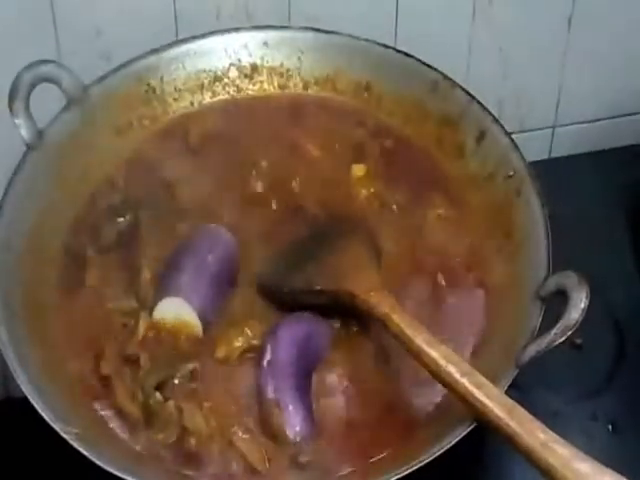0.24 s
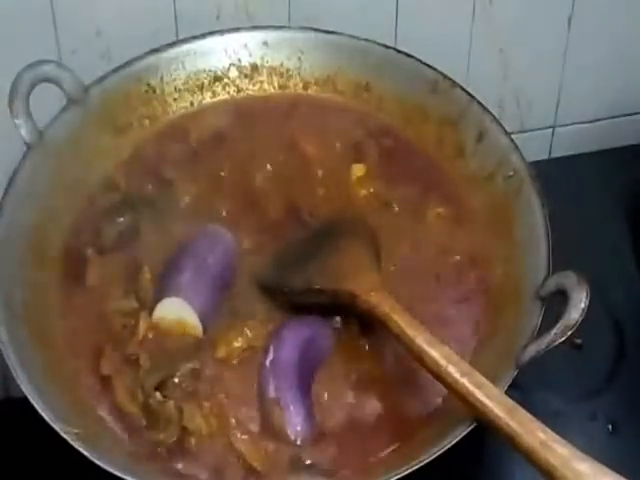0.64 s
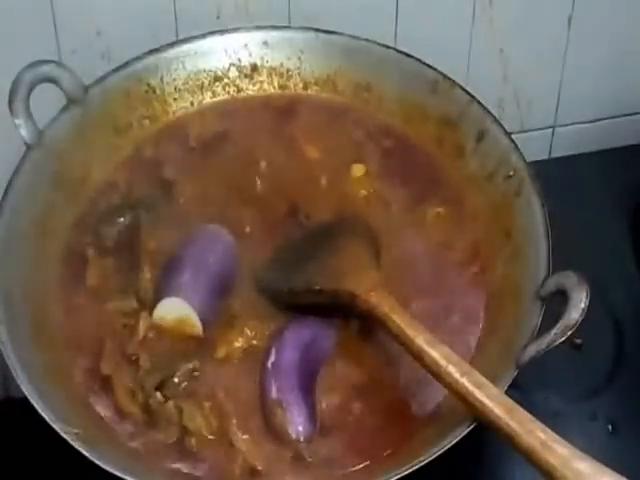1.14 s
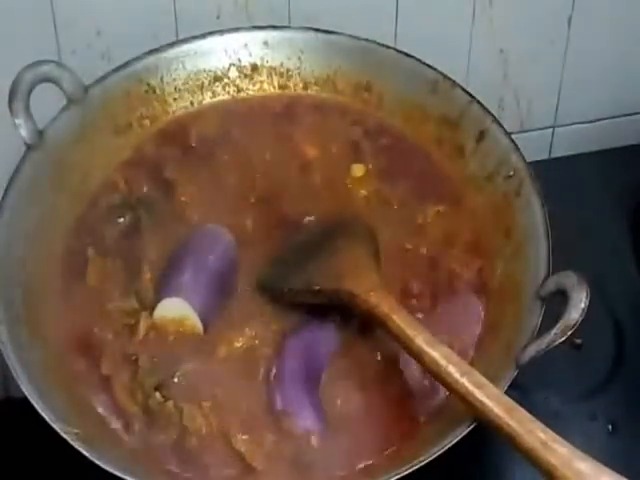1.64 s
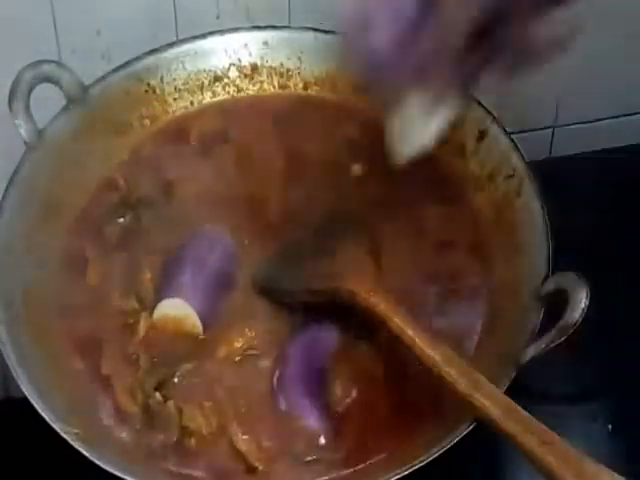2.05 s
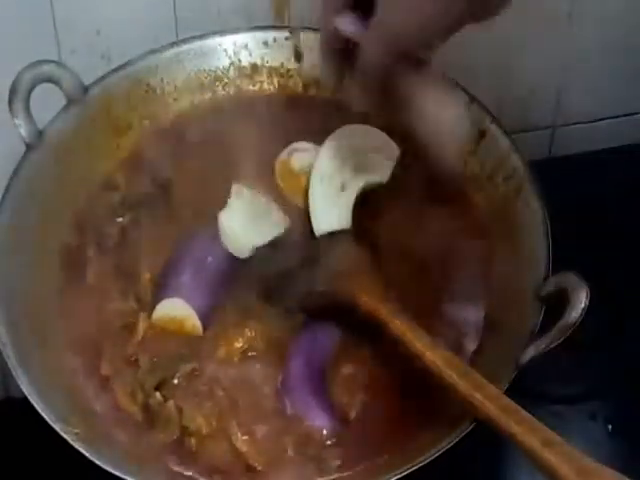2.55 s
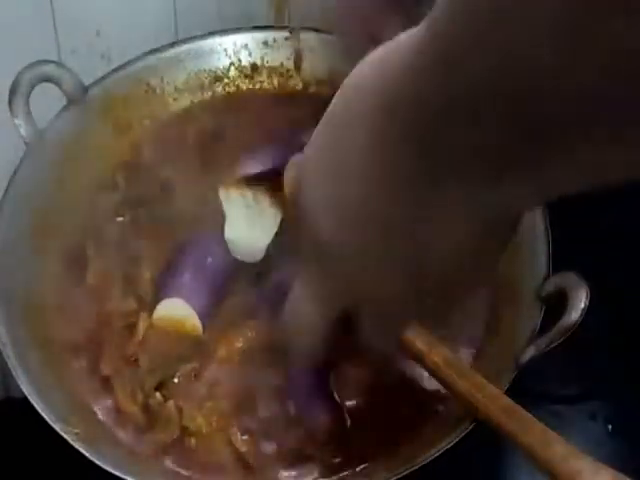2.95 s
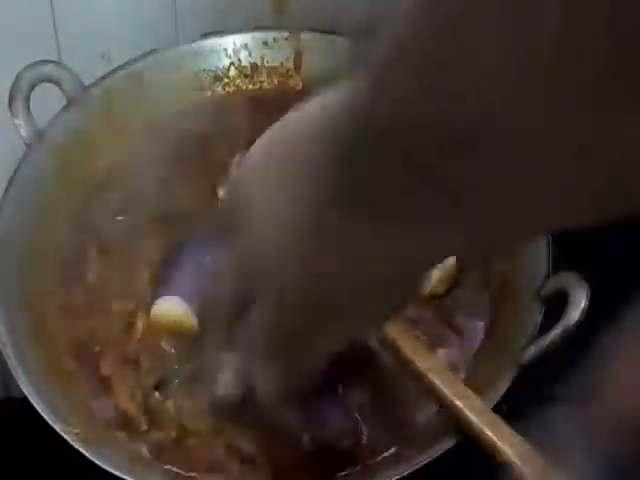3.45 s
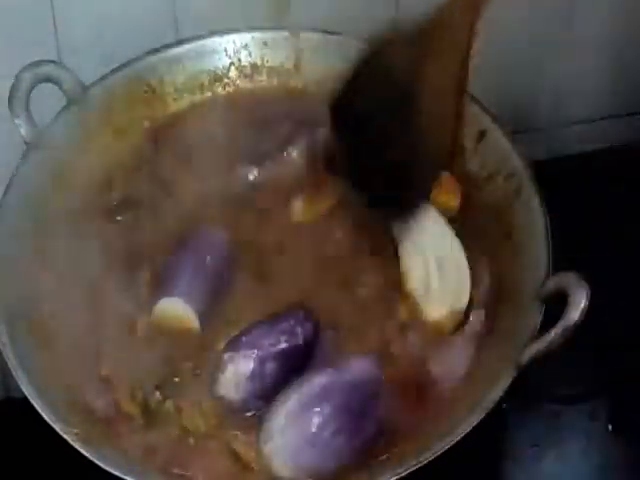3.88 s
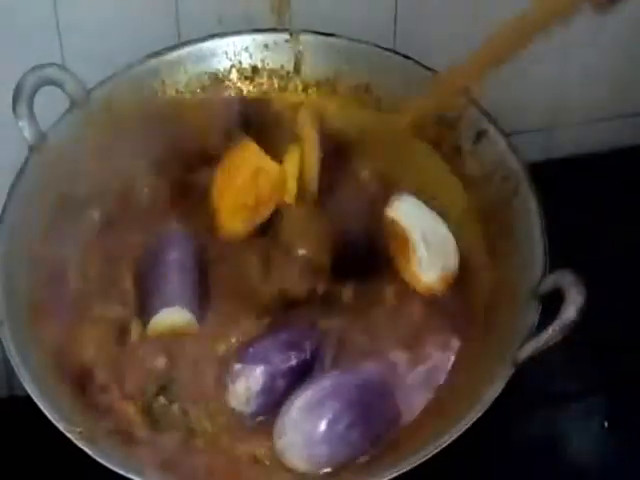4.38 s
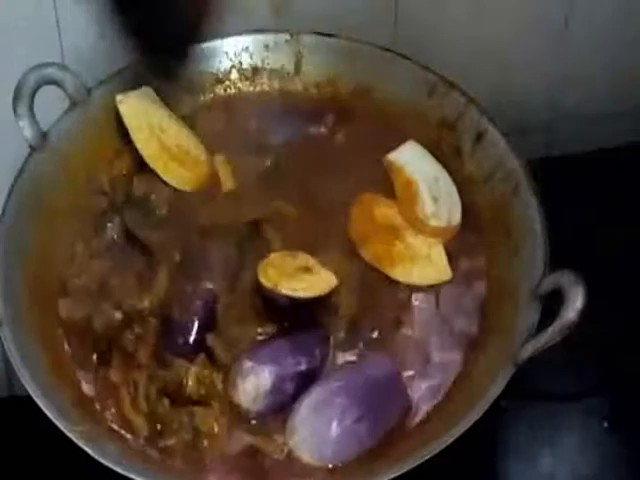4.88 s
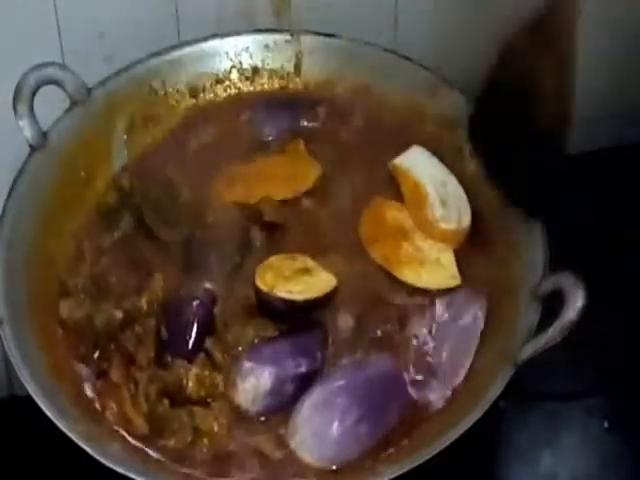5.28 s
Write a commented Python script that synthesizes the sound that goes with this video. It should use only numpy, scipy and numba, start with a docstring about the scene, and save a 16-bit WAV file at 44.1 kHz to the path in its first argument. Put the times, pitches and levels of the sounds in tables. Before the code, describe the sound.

A continuous bubbling simmer with bright oil sizzle and irregular dry crackles, heard very near. Early spits and squeaky steam lead to a soft thud and low wet plops as eggplant drops in. Sharp snaps strike midway, sauce sloshes about a second later, then pops thin out under thin bird chirps before one big burst. Low burner rumble lies beneath; the phone briefly dips after loud pops.

```python
"""Bubbles pop and oil spits in thick sauce boiling in a steel wok, close to a phone in a tiled kitchen.
Each pop is a click and a dying spray of noise ringing a small cavity; thousands of tiny ones make the simmer.
Vegetables plop and thud in, the sauce sloshes as filtered noise, and steam squeaks as gliding notes.
Outside a small bird peeps, over a low rumble and hum. The level dips briefly after loud pops."""
import sys
import numpy as np
from scipy import signal
from scipy.fft import rfft, irfft
from scipy.io import wavfile
from scipy.ndimage import uniform_filter1d
from numba import njit

SR = 44100
rng = np.random.default_rng(int(sys.argv[2]) if len(sys.argv) > 2 else 0)


def generate_wav(signal):
    """Clip the signal to [-1, 1] and save it as 16-bit WAV at the path in sys.argv[1]."""
    frames = np.transpose(np.atleast_2d(signal))
    scaled = np.clip(frames, -1, 1) * 32767
    pcm = np.round(scaled).astype(np.int16)
    wavfile.write(sys.argv[1], SR, pcm)


N = 243476  # length [samples]
# Table levels are set before the steel and the microphone change them.


def undb(db):
    """Turn decibels into a plain multiplier."""
    return 10 ** (np.asarray(db) / 20)


def level(x, db):
    """Scale a sound to an average (RMS) level in dB."""
    return x * undb(db) / np.sqrt(np.mean(x ** 2))


def colour(x, table):
    """Filter whose gain follows (Hz, dB) points and which never answers before its input (folded cepstrum)."""
    hz, db = np.transpose(table)
    size = 2 ** 13
    log_hz = np.log(np.fft.rfftfreq(size, 1 / SR) + 1)  # +1 avoids log of zero
    cepstrum = irfft(np.log(undb(np.interp(log_hz, np.log(hz), db))))
    cepstrum[1:size // 2] *= 2
    cepstrum[size // 2 + 1:] = 0
    response = irfft(np.exp(rfft(cepstrum)))
    return signal.fftconvolve(x, response)[:N]


def band(x, low_hz, high_hz):
    """Keep only the range between two pitches."""
    return signal.sosfilt(signal.butter(2, [low_hz, high_hz], "band", fs=SR, output="sos"), x)


def sputter(clump_s, spread_db):
    """Noise in short uneven clumps: droplets and echoes after a burst."""
    k = int(clump_s * SR)
    steps = np.repeat(undb(spread_db * rng.standard_normal(N // 4)), k)[:N]
    clumps = uniform_filter1d(steps, k)
    return level(clumps * rng.standard_normal(N), 0)


@njit
def bursts(n, rate, s, size, hz, width, t60, tail, rise, noise, push, click):
    """Each burst is a click, a short push and a dying spray, ringing a cavity whose pitch can rise as it opens."""
    out = np.zeros(n)
    for e in range(len(s)):
        start = int(s[e] * rate)
        band_state, low_state, turns = 0., 0., 0.
        spray = tail[e]
        fade = np.exp(-np.log(1000.) / (t60[e] * rate))  # down 60 dB after t60
        damping = width[e] / hz[e]
        kick = rate / (2 * np.pi * width[e])
        for i in range(start, min(n, start + int(t60[e] * rate))):
            now_hz = hz[e] * (1 + rise * (1 - spray / tail[e]))
            g = np.tan(np.pi * now_hz / rate)
            drive = spray * np.sqrt(kick) * noise[(i + 7919 * e) % n]
            if i == start:
                drive += click * kick
            if turns < push:
                drive += np.cos(2 * np.pi * turns) * np.cos(.5 * np.pi * turns / push)
                turns += now_hz / rate
            # one step of a band-pass resonator
            ring = (band_state + g * (drive - low_state)) / (1 + g * (g + damping))
            band_state, low_state = 2 * ring - band_state, low_state + 2 * g * ring
            out[i] += size[e] * damping * ring
            spray *= fade
    return out


def play(s, db, hz, t60, cycles, tail_db, rise, push=(0, 0)):
    """Bursts in a cavity of sharpness (Q) cycles, with a sputtering tail; push is (cycles, first click dB)."""
    ones = np.ones(len(s))
    spray = sputter(clump_s=.0008, spread_db=3.8)
    return bursts(N, 1. * SR, s, undb(db), hz * ones, hz / cycles * ones, np.clip(t60, .004, .4) * ones,
                  undb(tail_db) * ones, rise, spray, 1. * push[0], float(undb(push[1])))


def tail_under(db, tail):
    """The louder the click, the further its tail lies under it."""
    _, tail_db, drop_per_db = tail
    return tail_db - drop_per_db * (db + 10)


CRACK_TAIL_DB = -6  # the crack sputters less than the cavity


def pops(table, tail, push, cycles, crack_db, crack_hz, rise):
    """Loud single bursts: the cavity note and the broad crack of the tearing film."""
    s, db, hz = table
    t60, tail_db = tail[0], tail_under(db, tail)
    cavity = play(s, db, hz, t60, cycles, tail_db, rise, push)
    crack = play(s, db + crack_db, crack_hz, t60, 0.8, tail_db + CRACK_TAIL_DB, 0.)
    return cavity + crack


def notes(table, end_s):
    """Pure notes that glide straight from one pitch to another, with soft ends."""
    out, t = np.zeros(N), np.arange(N) / SR
    for s, length, first_hz, last_hz, db in table:
        ends = np.clip(np.minimum(t - s, s + length - t) / end_s, 0, 1)
        hz = np.interp(t, (s, s + length), (first_hz, last_hz))
        tone = np.sin(2 * np.pi * np.cumsum(hz) / SR)
        out += ends * np.sqrt(2) * undb(db) * tone
    return out


# Tone of the burner and house rumble: (pitch [Hz], relative level per Hz [dB])
RUMBLE_TONE = [(15, -28), (25, -12.5), (130, -10.5), (165, -3), (215, -3), (245, 1), (285, -4), (330, 2.5),
               (380, 1.5), (430, -11), (700, -59)]
RUMBLE_DB = -55


def rumble():
    """Burner and house rumble: noise filtered down to the bass."""
    return level(colour(rng.standard_normal(N), RUMBLE_TONE), RUMBLE_DB)


# A faint low hum that comes and goes:
# (start time [s], length [s], first pitch [Hz], last pitch [Hz], level [dB])
HUM_NOTES = [(0, 0.48, 237, 251.4, -58), (1.95, 0.64, 233.6, 256.5, -61)]


def hum():
    """Low pure notes that swell in and fade out."""
    return notes(HUM_NOTES, end_s=0.072)


# Peeps of a small bird: (start time [s], length [s], first pitch [Hz], last pitch [Hz], level [dB])
BIRD_PEEPS = [(.237, .065, 5930, 5910, -33), (2.24, .07, 7680, 7830, -36), (2.312, .022, 7750, 7600, -35),
              (2.435, .035, 8200, 7300, -39), (2.687, .058, 5760, 5950, -39.5),
              (4.81, .09, 5450, 6150, -37), (4.972, .03, 7500, 7800, -42), (4.998, .06, 7830, 7920, -29),
              (5.057, .03, 7770, 7600, -33), (5.186, .016, 7850, 7580, -31), (5.203, .018, 7250, 7150, -34),
              (5.208, .04, 7880, 7860, -39), (5.228, .02, 6000, 5600, -39), (5.325, .04, 6820, 7020, -33),
              (5.408, .035, 7450, 7000, -35)]


def bird(echo_db, t60, rough):
    """Slightly hoarse peeps from outside, blurred by the walls on their way in."""
    t = np.arange(int(t60 * SR)) / SR
    walls = rng.standard_normal(len(t)) * undb(-60 * t / t60)
    hoarseness = level(uniform_filter1d(rng.standard_normal(N), size=220), 0)
    peeps = notes(BIRD_PEEPS, end_s=0.007) * (1 + rough * hoarseness)
    echo = signal.fftconvolve(peeps, walls / np.linalg.norm(walls))[:N]
    return peeps + undb(echo_db) * echo


# Ringing modes of the steel: (pitch [Hz], width [Hz], lift ringing freely [dB], lift when loaded [dB])
STEEL_MODES = [(459, 38, 0.22, 0.75), (605, 15.4, 4.6, 6.7), (1080, 43, 11.3, 3.6), (1336, 11, 0.33, 6.7),
               (1830, 10, 9.5, 0.74), (2060, 9.6, 6.7, 0.33), (2370, 23, 7.8, 4.8), (3070, 59, 1.3, 2.7),
               (4670, 14, 2.8, 4.5)]
# How far sauce and vegetables load the steel: (time [s], load [0 free to 1 loaded])
STEEL_LOAD = [(0, 0.56), (.8, 0.27), (.92, 0.046), (1.6, 0.08), (1.72, 0.42), (1.92, .2), (2.3, 0.29),
              (2.42, 0.55), (2.9, 0.95), (5.52, 1)]
SWAY_S, SWAY_DB = .12, 1.5  # moving sauce frees and damps each mode: step time, typical depth


def wok(x):
    """The steel bowl lifts its own modes; what lies in it damps some and frees others."""
    t = np.arange(N) / SR
    load = np.interp(t, *np.transpose(STEEL_LOAD))
    knots = np.arange(0, t[-1] + SWAY_S, SWAY_S)
    out = x
    for hz, width, free_db, loaded_db in STEEL_MODES:
        sway_db = SWAY_DB * np.interp(t, knots, rng.standard_normal(len(knots)))
        lift = undb(free_db + load * (loaded_db - free_db) + sway_db) - 1
        out = out + lift * signal.lfilter(*signal.iirpeak(hz, hz / width, SR), x)
    return out


PAN_LOW_HZ = 398  # the pan is too small to radiate below this


def rim(x):
    """The open bowl sends out no deep bass."""
    return signal.sosfilt(signal.ellip(5, .5, 30, PAN_LOW_HZ, "high", fs=SR, output="sos"), x)


def swarm(count, low_hz, high_hz, spread_db, cycles, t60, hiss_db):
    """Tiny random bursts of uneven strength, over the hiss of the ones too many to tell apart."""
    when, pitch, strength, ring = rng.random((count, 4)).T
    hz = low_hz * (high_hz / low_hz) ** pitch
    db = -spread_db * np.log(strength * 1.3 + 0.1)
    grains = play(when * N / SR, db, hz, t60, cycles * 1.2 ** (ring - .4), -5, 0.017, (3.0, -1))
    hiss = band(rng.standard_normal(N), low_hz, high_hz)
    return level(level(grains, 0) + level(hiss, hiss_db), 0)


# Strength of the simmer: (time [s], gurgle level [dB], fizz level [dB], sizzle level [dB])
SIMMER_LEVELS = [(0.0, -34, -29, -29.5), (0.42, -33.5, -29, -30), (1.0, -33, -29.5, -28),
                 (1.18, -35, -34.5, -30), (1.41, -34, -29.5, -28), (1.83, -35, -30.5, -30.5),
                 (2.38, -30.5, -28, -27.5), (2.72, -36, -30.5, -29.5), (2.93, -30.5, -31.5, -29.5),
                 (3.2, -34, -31, -30), (3.5, -33.5, -31, -32), (3.75, -32.5, -30.5, -31.5),
                 (3.93, -33, -30, -30), (4.26, -32, -31.5, -31.5), (4.43, -33.5, -29.5, -28.5),
                 (4.7, -35.5, -30, -32), (5.12, -34, -34, -31.5), (5.52, -35, -31.5, -29)]
HEAVE_S, HEAVE_DB = 0.026, 1  # the whole boil heaves and settles: smoothing time, typical depth


def simmer():
    """Large bubbles gurgle, small ones fizz, oil sizzles; all heave together and ring the steel."""
    s, *columns = np.transpose(SIMMER_LEVELS)
    gurgle, fizz, sizzle = (undb(np.interp(np.arange(N) / SR, s, c)) for c in columns)
    k = int(HEAVE_S * SR)
    drift = uniform_filter1d(uniform_filter1d(rng.standard_normal(N), k), k)
    heave = level(undb(level(drift, 0) * HEAVE_DB), 0)
    boil = gurgle * swarm(count=1400, low_hz=285, high_hz=1500, spread_db=-3.5, cycles=3.74, t60=0.15, hiss_db=1.0)
    boil += fizz * swarm(count=1600, low_hz=1396, high_hz=5040, spread_db=2.2, cycles=9.9, t60=0.12, hiss_db=-8)
    boil += sizzle * swarm(count=1800, low_hz=5030, high_hz=12630, spread_db=3.5, cycles=5.7, t60=0.047,
                           hiss_db=-2.5)
    return wok(heave * boil)


def crackle(count, hz, db, spread_db):
    """Dry broad ticks of droplets flashing on hot steel, up to an octave either side of hz."""
    when, strength, pitch = rng.random((count, 3)).T
    tick_db = db - spread_db * np.log(strength + .05)
    return play(when * N / SR, tick_db, hz * 2 ** (2 * pitch - 1), 0.039, 1.3, -11, 0.)


# Steam squeaking out through the sauce:
# (start time [s], length [s], first pitch [Hz], last pitch [Hz], level [dB])
STEAM_SQUEAKS = [(.8, .022, 4320, 4280, -40), (.96, .035, 2900, 3050, -42), (1.035, 0.025, 3050, 3000, -33),
                 (1.075, .05, 1750, 1750, -37), (1.11, 0.035, 3350, 3500, -39),
                 (1.145, .03, 3600, 3750, -41), (1.165, .05, 3250, 3120, -36),
                 (1.24, 0.06, 3250, 3080, -40)]


def squeaks():
    """Escaping steam sings short gliding notes."""
    return notes(STEAM_SQUEAKS, end_s=0.0042)


# Wet surges as pieces drop in, foam collapses and the spatula pushes the sauce:
# (middle time [s], half length [s], low edge [Hz], high edge [Hz], level [dB])
SURGES = [(0.956, 0.026, 2000, 5300, -28), (1.04, 0.042, 1000, 3300, -31.5),
          (1.18, 0.068, 1500, 3600, -29.5), (1.472, 0.0099, 2800, 7200, -21),
          (2.284, 0.011, 400, 2020, -29), (2.37, 0.012, 380, 2500, -37), (2.425, 0.019, 380, 1840, -30),
          (2.95, 0.13, 377, 1120, -40.5), (3.462, 0.028, 397, 2520, -29.5), (3.924, 0.016, 503, 2550, -37),
          (4.445, 0.046, 450, 3030, -26.5), (4.535, 0.03, 450, 1500, -36), (4.63, 0.012, 450, 2500, -27)]


def sloshes():
    """Each surge is a swell of sputtering spray in its own range, ringing the steel."""
    t, spray, out = np.arange(N) / SR, sputter(clump_s=0.0024, spread_db=4), 0
    for s, half, low_hz, high_hz, db in SURGES:
        swell = np.exp(-((t - s) / half) ** 2)
        out = out + level(band(spray, low_hz, high_hz), db) * swell
    return wok(out)


# The first piece hits the pan: (time [s], pitch [Hz], time to fade 60 dB [s])
PAN_THUD = [(2.24, 150, .1)]
THUD_DB = -49


def thud():
    """A low, quickly damped knock."""
    s, hz, t60 = np.transpose(PAN_THUD)
    return play(s, np.full(len(s), THUD_DB), hz, t60, 1.4, 0, 0.)


# Each TAIL below: (time to fade 60 dB [s], tail level for a -10 dB burst [dB], extra drop per dB louder [dB])
# Each PUSH below, the drive as the cavity opens: (length [cycles], first click [dB])

# Big slow bubbles and pieces plopping: (time [s], level [dB], pitch [Hz])
PLOP_EVENTS = [(.464, -23, 533), (.49, -17, 1180), (.738, -20, 1100), (.8, -24, 543), (.92, -20, 566),
               (1.031, -25, 1080), (1.033, -21, 1200), (1.053, -24, 1150), (1.099, -29, 564),
               (1.09, -23.5, 1080), (1.564, -22, 1070), (1.817, -28, 1180), (1.937, -20, 1180),
               (2.167, -28, 565), (2.211, -22, 880), (2.266, -21, 600), (2.274, -17, 1310),
               (2.311, -28, 560), (2.357, -17, 494), (2.36, -14, 700), (2.419, -23, 1080),
               (2.423, -34, 1290), (2.44, -22, 444), (2.459, -17, 587), (2.513, -17, 1140),
               (2.548, -24, 573), (2.623, -22, 855), (2.64, -22, 690), (2.66, -19, 1020), (2.834, -20, 496),
               (2.89, -27, 510), (2.931, -18.5, 410), (2.945, -22, 465), (2.948, -22, 955),
               (2.981, -35, 590), (3.045, -21, 746), (3.116, -21, 585), (3.028, -27, 477),
               (3.18, -21.5, 597), (3.454, -24, 550), (3.923, -19, 1000), (3.944, -20, 1050),
               (4.195, -21, 751), (4.405, -23, 1080), (4.511, -19, 675), (5.473, -22, 560),
               (5.501, -10, 600)]
PLOP_TAIL, PLOP_PUSH = (0.15, -16, 0.19), (1.6, -8)


def plops():
    """Large cavities give low notes that rise strongly as they open."""
    return pops(np.transpose(PLOP_EVENTS), PLOP_TAIL, PLOP_PUSH, cycles=2.5, crack_db=-3.0, crack_hz=1500, rise=0.72)


# Bare snaps of a water drop flashing in oil: (time [s], level [dB])
SNAP_EVENTS = [(.4805, -8), (3.118, -1), (3.4867, 10), (3.5492, 4), (4.416, -10), (4.4275, -10),
               (4.495, -12), (4.6858, -10), (4.76, -12)]
SNAP_HZ = 8500


def snaps():
    """A flashing drop gives a very short, broad click."""
    s, db = np.transpose(SNAP_EVENTS)
    return play(s, db, SNAP_HZ, .01, 1.4, -14, 0.)


# Oil and water spitting: (time [s], level [dB], pitch [Hz], top edge against that level as heard [dB])
SPIT_EVENTS = [(.04, -10.5, 9900, -15), (0.042, -14, 6440, -25), (.1073, -12, 10280, -20),
               (0.2262, -10.5, 8440, -25), (.357, -11, 10200, -16), (.363, -9, 6700, -28),
               (.4395, -6, 6700, -28), (0.481, -10, 6700, -4), (.4909, -11, 10240, -20),
               (0.5418, -11, 10100, -18), (.555, -18, 6500, -25), (0.5696, -9, 6240, -22),
               (0.5928, -4.5, 9100, -21), (.598, -14, 9690, -22), (0.8272, -13, 9650, -23),
               (.879, -12, 9250, -2), (.886, -15, 9500, -20), (0.93, -13, 9700, -19), (.94, -10, 6500, -25),
               (0.943, -12, 9800, -2), (.96, -11, 7800, -13), (1.0125, -13.5, 9700, -20),
               (1.085, -5.5, 7900, -22), (1.145, -16, 8600, -17), (1.1597, -10, 9700, -17),
               (1.165, -9, 9600, -18), (1.186, -14, 9050, -22), (1.2203, -13.5, 8500, -21),
               (1.384, -15, 9100, -22), (1.408, -18, 10300, -23), (1.4579, -7, 6660, -34),
               (1.48, -12, 6000, -27), (1.482, -12, 8300, -25), (1.527, -5, 9200, -21),
               (1.575, -21, 9770, -20), (1.601, -16, 9020, -21), (1.768, -4, 9900, -10),
               (1.768, -9, 7850, -28), (1.7887, 3, 7800, -31), (1.879, -16, 7600, -15),
               (1.895, -12, 10500, -20), (1.913, -18, 7500, -28), (1.919, -14, 9170, -28),
               (1.939, -6.5, 10800, -2), (1.94, -16, 7800, -25), (1.974, -16, 8500, -22),
               (2.006, -16, 8800, -22), (2.02, -19, 6200, -25), (2.038, -1, 6100, -30),
               (2.0407, 0.5, 8550, -27), (2.08, -9.5, 10600, -16), (2.1244, -8, 7100, -22),
               (2.14, -20, 9770, -22), (2.223, -13, 5300, -19), (2.268, -8.5, 5100, -21),
               (2.311, -16, 11500, -3), (2.3417, -9, 9450, -15), (2.3624, -13, 6700, -18),
               (2.3985, -14, 9500, 3), (2.414, -13, 10410, -10), (2.426, -10, 6540, -25),
               (2.441, -11, 9700, -15), (2.4687, -13, 9050, -9), (2.487, -13, 5730, -7),
               (2.565, -14, 10100, -22), (2.626, -8.5, 5650, -20), (2.767, -12, 10270, -22),
               (2.807, -11, 11200, -12), (2.8316, -10, 7800, -25), (2.9524, -1, 10800, -24),
               (2.954, -6.5, 7300, -28), (2.979, -4, 8900, -31), (3.118, -10, 10900, 5),
               (3.14, -10, 10200, -3), (3.18, -14, 10500, -31), (3.188, -11, 9600, -7),
               (3.289, -15, 5950, -25), (3.296, -13, 10450, -13), (3.31, -7, 7200, -8),
               (3.318, -11, 6370, -25), (3.3195, -14, 9070, -6), (3.3246, -8.5, 11500, 0),
               (3.3897, -17.5, 9900, -20), (3.405, -12.5, 8900, -21), (3.449, -15, 8750, -19),
               (3.4712, -8, 7200, -21), (3.4723, -12, 9000, -15), (3.4863, -5, 10500, -4),
               (3.549, -13, 9900, -26), (3.5534, -3.5, 5750, -25), (3.758, -15, 10900, -17),
               (3.859, -15, 6800, -25), (3.9324, -8.5, 9000, -21), (3.988, -25, 11200, -15),
               (4.005, -14, 11000, -13), (4.1193, -9.5, 9500, -10), (4.117, -14.5, 6540, -25),
               (4.1409, -9.5, 10200, -16), (4.192, -17, 6800, -25), (4.274, -20, 9450, -24),
               (4.277, -10.5, 6600, -27), (4.5356, -11, 9200, -3), (4.536, -11, 7000, -25),
               (4.553, -16, 9730, -23), (4.632, -17, 10800, -18), (4.686, -16, 10500, 1),
               (4.687, -15, 7660, -22), (4.7142, -7, 5430, -24), (4.722, -15, 11200, -15),
               (4.7322, -13, 7700, -22), (4.736, -13, 5800, -25), (4.76, -15, 7480, -19),
               (4.8065, -11, 6400, -25), (4.83, -13.5, 6800, -25), (4.858, -10, 9400, -26),
               (5.187, -11, 7300, -23), (5.3287, -25, 9400, -10), (5.4112, -14, 7900, -21),
               (5.463, -15, 11000, -18), (5.5, -2, 6240, -30), (5.501, -2, 10300, -25),
               (5.5027, 3, 8300, -25), (5.516, -5, 8000, -22)]
SPIT_TAIL, SPIT_PUSH = (0.059, -12.5, 0.18), (4.2, -6)


def spits(edge_hz):
    """High bursts, each with its own sharp edge at the top of the range."""
    s, db, hz, edge_db = np.transpose(SPIT_EVENTS)
    mic_db = np.interp(edge_hz, *np.transpose(MIC_TONE))  # allow for what the microphone will take away
    edge = play(s, db + edge_db - mic_db, edge_hz, SPIT_TAIL[0], 3.7, tail_under(db, SPIT_TAIL), 0.)
    return edge + pops((s, db, hz), SPIT_TAIL, SPIT_PUSH, cycles=6.1, crack_db=6.5, crack_hz=6600, rise=0.)


# Steam bubbles bursting at the surface: (time [s], level [dB], cavity pitch [Hz])
BUBBLE_EVENTS = [(0.014, -16, 3000), (.034, -23, 4300), (0.035, -20, 1870), (0.061, -28, 1730),
                 (.103, -22, 2140), (.172, -16.5, 3430), (0.178, -16, 2630), (.18, -19, 3500),
                 (0.228, -12, 3070), (.24, -23, 4260), (0.259, -11.5, 4670), (0.261, -20, 3000),
                 (0.271, -23, 1810), (.325, -18, 5500), (0.329, -20, 2630), (0.346, -13, 3080),
                 (.356, -22, 1880), (0.423, -14, 3260), (0.4252, -8, 3830), (.4394, -15, 4540),
                 (0.4816, -13, 4200), (0.4876, -13, 3250), (.5131, -18, 2370), (0.5677, -21, 3280),
                 (.571, -12, 2550), (.582, -20, 4440), (0.672, -18.5, 2370), (.723, -17, 2750),
                 (.755, -18, 5350), (.779, -23, 2720), (0.834, -19.5, 2230), (0.898, -23, 4770),
                 (0.953, -23, 2370), (.964, -31, 1650), (.97, -18, 2750), (1.003, -20, 4770),
                 (1.093, -20, 2490), (1.1465, -17.5, 3200), (1.161, -20, 1630), (1.195, -20.5, 1900),
                 (1.207, -22.5, 1550), (1.222, -21, 2450), (1.285, -25, 2040), (1.32, -27, 1610),
                 (1.22, -19, 4660), (1.2635, -19, 2710), (1.321, -22, 4770), (1.364, -20, 1950),
                 (1.457, -9, 4400), (1.455, -19, 3100), (1.478, -21, 2000), (1.4813, -12, 4200),
                 (1.552, -21, 3000), (1.554, -18, 2070), (1.655, -19, 3370), (1.656, -17, 4760),
                 (1.675, -13.5, 2460), (1.713, -18, 2800), (1.719, -25, 2930), (1.7237, -23, 3130),
                 (1.768, -18.5, 1680), (1.777, -22, 3050), (1.788, -6, 4250), (1.794, -13, 4260),
                 (1.8165, -18.5, 1960), (1.8465, -16, 2120), (1.886, -16, 5350), (1.893, -21, 5700),
                 (1.954, -14, 5550), (1.979, -15, 4360), (2.05, -18, 2080), (2.073, -21, 2940),
                 (2.1213, -14.5, 3500), (2.135, -12.5, 4970), (2.202, -20, 2100), (2.222, -14.5, 4320),
                 (2.251, -19, 2490), (2.314, -21, 3480), (2.3125, -21, 1580), (2.337, -25, 4500),
                 (2.358, -19.5, 1580), (2.361, -15, 3400), (2.364, -16.5, 2200), (2.427, -19.5, 1500),
                 (2.471, -23, 1680), (2.478, -17, 2880), (2.4867, -11.5, 4470), (2.557, -21.5, 2890),
                 (2.591, -23, 5800), (2.628, -14.5, 2900), (2.724, -20.5, 2510), (2.827, -17, 4260),
                 (2.89, -26, 1500), (2.903, -20.5, 2370), (2.952, -19.5, 2240), (3.04, -17, 5570),
                 (3.055, -20.5, 2060), (3.068, -18.5, 2500), (3.118, -21, 2070), (3.1342, -18.5, 1800),
                 (3.18, -22.5, 1560), (3.227, -22, 4600), (3.2789, -19, 1740), (3.296, -18, 2130),
                 (3.318, -17, 3000), (3.334, -17, 4000), (3.404, -18, 3800), (3.412, -18, 3500),
                 (3.448, -22, 3780), (3.453, -18.5, 2090), (3.462, -17, 5000), (3.469, -15, 3100),
                 (3.593, -19, 2240), (3.595, -21, 3060), (3.618, -29, 1600), (3.624, -19, 3520),
                 (3.6356, -19, 2140), (3.696, -22, 3150), (3.711, -28, 4800), (3.71, -22, 1580),
                 (3.733, -22, 2540), (3.844, -24, 1830), (3.871, -23, 1580), (3.902, -19, 2440),
                 (3.9002, -17.5, 1760), (3.906, -19.5, 1720), (3.9175, -14.5, 2870), (3.928, -21, 2200),
                 (3.934, -22, 1610), (3.938, -22, 1570), (3.9606, -14, 3060), (4.022, -18, 3900),
                 (4.1004, -22, 1560), (4.203, -15.5, 3450), (4.227, -20, 3000), (4.274, -8.5, 4480),
                 (4.2768, -14.5, 3060), (4.33, -16.5, 4700), (4.4163, -20, 2900), (4.416, -16, 2090),
                 (4.422, -15, 2980), (4.4272, -15, 2330), (4.447, -29, 1500), (4.455, -26, 1680),
                 (4.458, -29, 2020), (4.4945, -16, 2500), (4.494, -23, 3140), (4.535, -21, 3070),
                 (4.5474, -21, 1680), (4.553, -20, 5000), (4.5727, -15.5, 2460), (4.572, -23, 2980),
                 (4.581, -16, 2400), (4.6108, -12.5, 2480), (4.63, -20, 1840), (4.729, -22, 1580),
                 (4.762, -21.5, 2390), (4.83, -17.5, 2960), (4.832, -18, 5530), (4.949, -21, 1590),
                 (5.011, -30, 1600), (5.047, -20, 1520), (5.064, -23.5, 1650), (5.18, -18, 5700),
                 (5.362, -13.5, 2670), (5.4768, -12, 1870), (5.501, -12, 1800), (5.501, -9, 2660),
                 (5.5015, 2, 3670)]
BUBBLE_TAIL, BUBBLE_PUSH = (0.075, -8, 0.08), (9, -4)


def bubbles():
    """The film tears with a crack and the opening cavity rings a slightly rising note."""
    return pops(np.transpose(BUBBLE_EVENTS), BUBBLE_TAIL, BUBBLE_PUSH, cycles=5.4, crack_db=4.5, crack_hz=3400,
                rise=0.059)


def scene():
    """Mix the boiling wok with the sounds that do not pass through its steel."""
    loud = bubbles() + spits(edge_hz=13000) + plops() + snaps()
    loud = loud + crackle(count=350, hz=3800, db=-25, spread_db=3.5)
    pan = rim(wok(loud) + simmer() + sloshes())
    background = rumble() + hum() + bird(echo_db=-8, t60=.3, rough=.3)
    return (pan + thud() + squeaks() + background)[None]


@njit
def duck(x, top, ratio, attack, release):
    """Gain control that follows the peaks and turns down what goes above top."""
    y, follower = np.empty(len(x)), 0.
    for i in range(len(x)):
        a = abs(x[i])
        follower += (a - follower) * (attack if a > follower else release)
        y[i] = x[i] * min(1., (top / (follower + 1e-9)) ** (1 - 1 / ratio))
    return y


# Tone of the phone's microphone: (pitch [Hz], gain [dB])
MIC_TONE = [(200, 2.5), (400, -3), (1000, -3), (4000, -6), (7000, -4), (9800, 2), (11500, -3),
            (13500, -10.5), (14800, -21), (15600, -34), (16300, -37)]
TOP_HZ = 16400  # nothing much passes above this
ATTACK_S, RELEASE_S = 0.0005, 0.022


def record(dry):
    """Microphone colour, gain control, rounded peaks, then the top is cut."""
    heard = duck(colour(dry[0], MIC_TONE), undb(-12), 4.9, 1 / (ATTACK_S * SR), 1 / (RELEASE_S * SR))
    rounded = 1.2 * np.tanh(heard / 1.2)
    return signal.sosfilt(signal.ellip(8, .2, 70, TOP_HZ, fs=SR, output="sos"), rounded)[None]


dry = scene()
out = record(dry)
generate_wav(out)
```